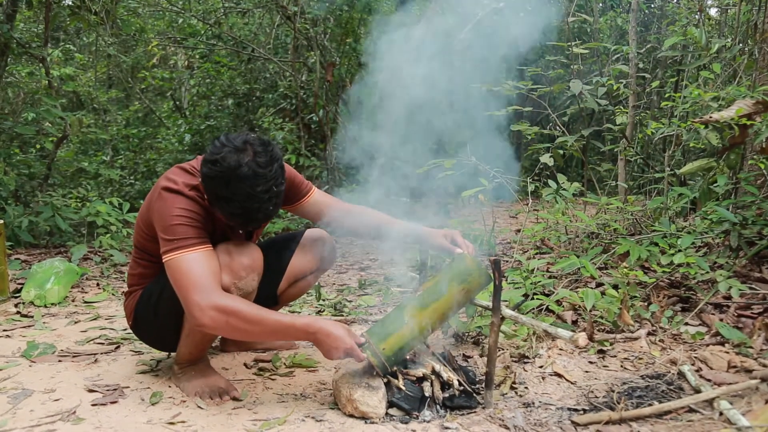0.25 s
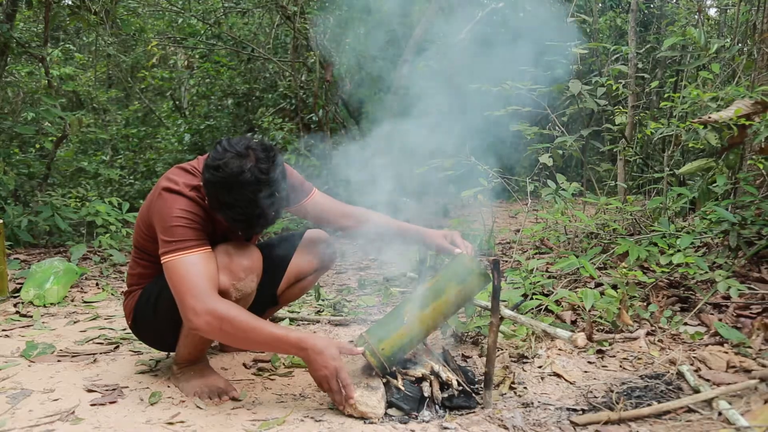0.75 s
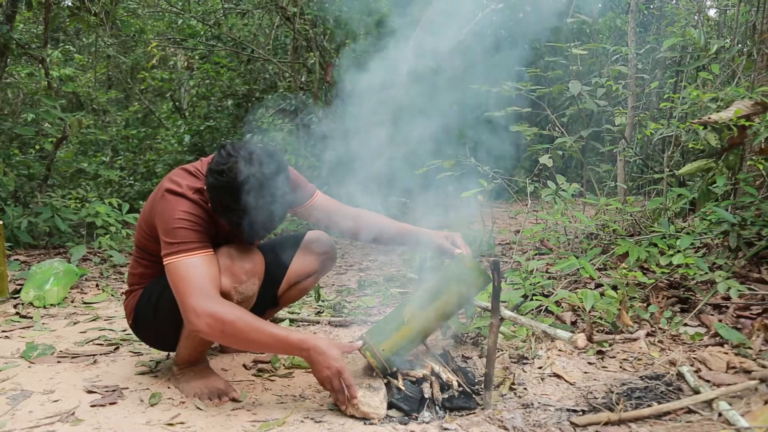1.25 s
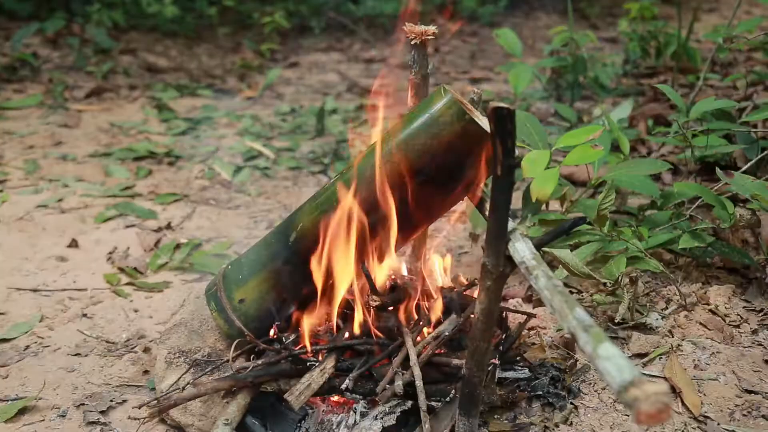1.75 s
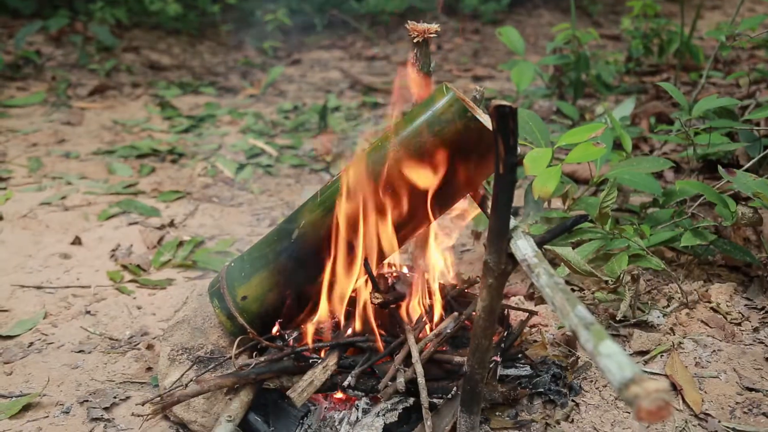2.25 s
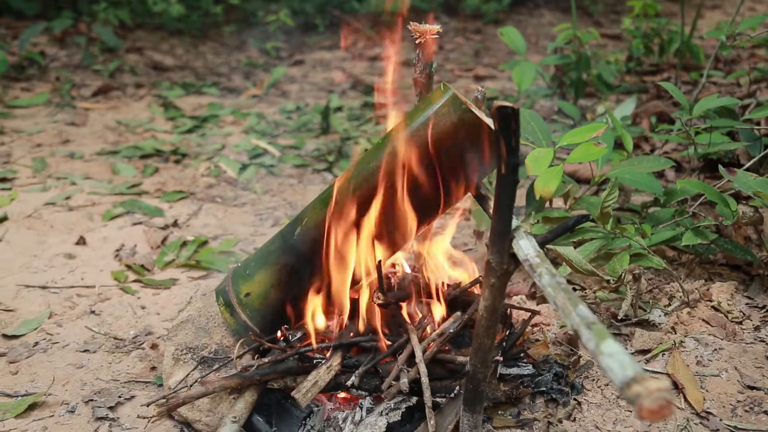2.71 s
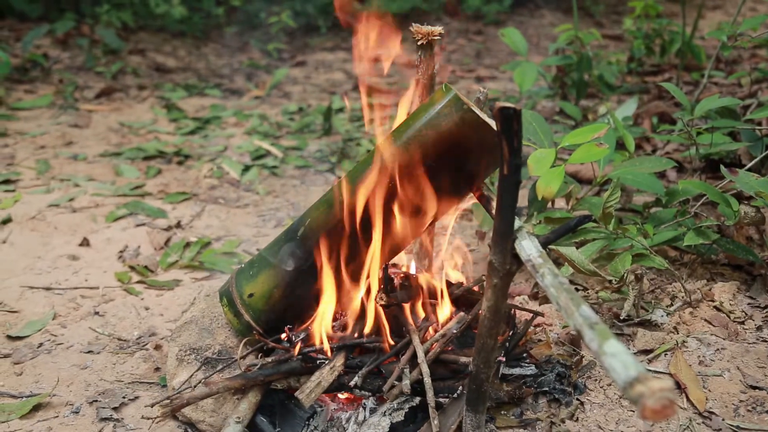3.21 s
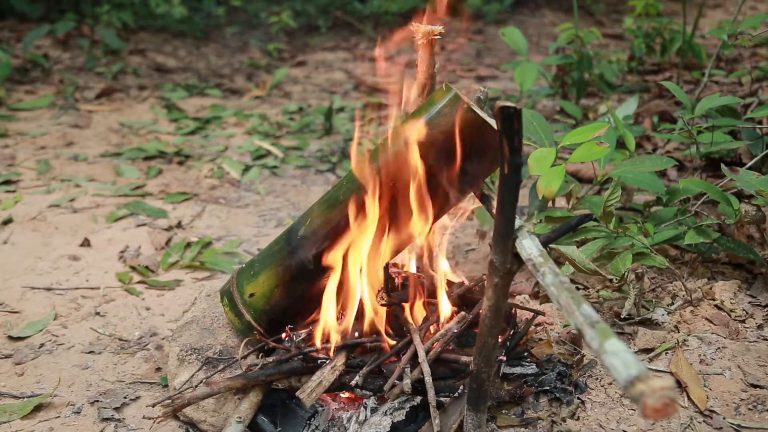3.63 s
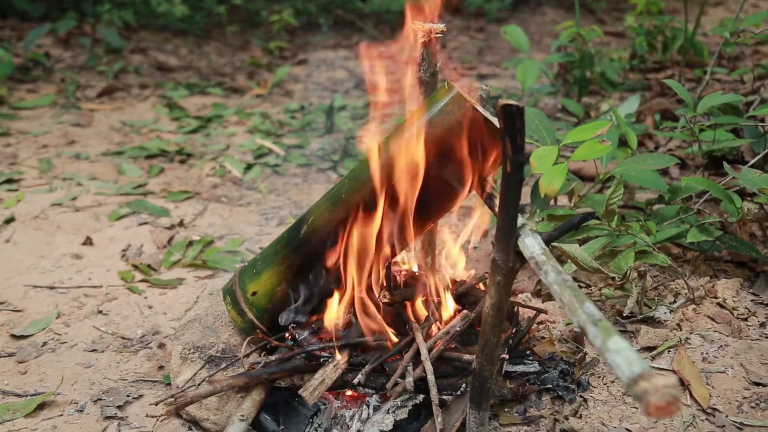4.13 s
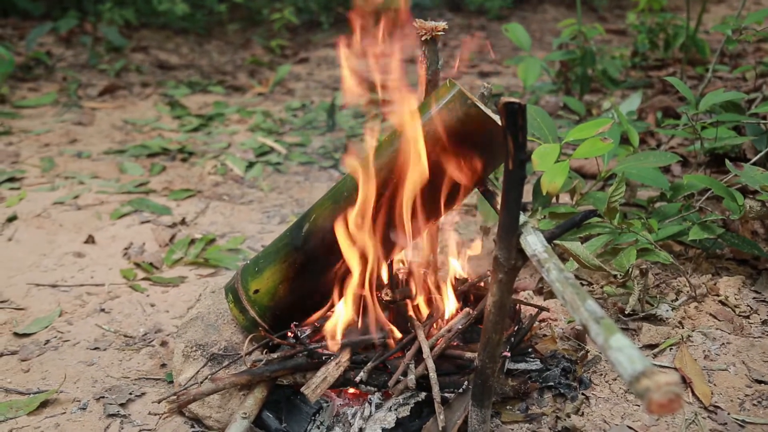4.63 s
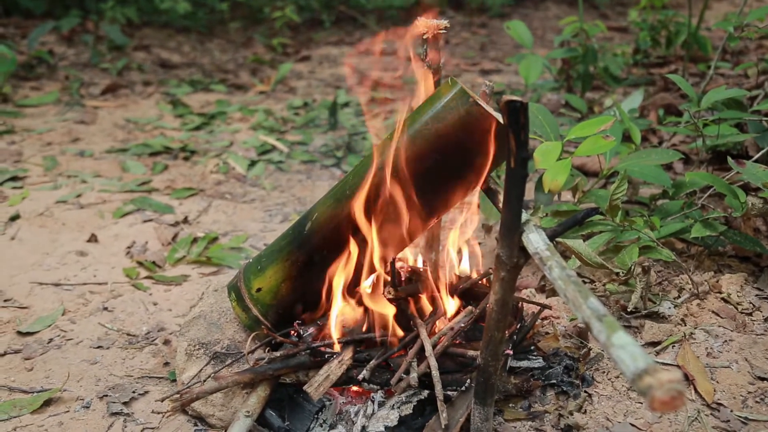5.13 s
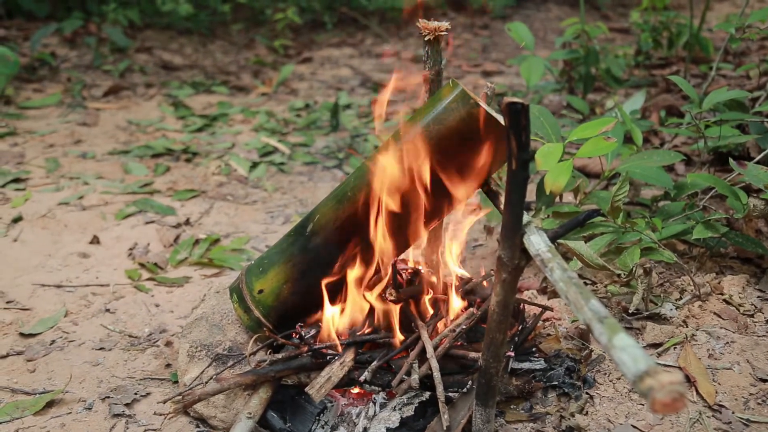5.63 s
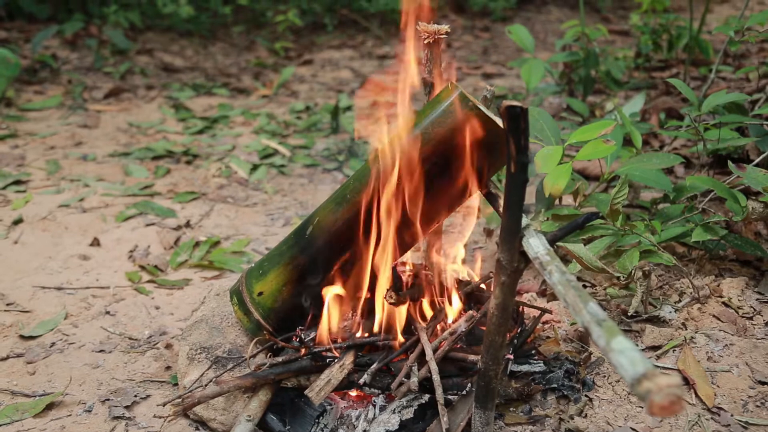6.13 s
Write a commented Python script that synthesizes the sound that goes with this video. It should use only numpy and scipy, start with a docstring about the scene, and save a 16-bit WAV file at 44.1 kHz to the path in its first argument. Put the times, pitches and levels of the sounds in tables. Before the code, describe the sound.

After a brief, quiet insect buzz outdoors, a nearby fire hisses and sizzles with steam, snapping and popping over softly fluttering flames.

```python
"""A forest, where cicadas drone with pulsing tymbals and a small smoky fire ticks.
After a short silence the fire is close and in full flame: sap steams out of a green bamboo tube
with a surging hiss, gusts make the flames flutter, fibres crackle and pockets of sap burst in pops.
The loudest pop overloads the microphone."""
import sys
import numpy as np
from scipy import signal
from scipy.fft import rfft, irfft, next_fast_len
from scipy.io import wavfile
from scipy.ndimage import uniform_filter1d

SR = 44100
rng = np.random.default_rng(int(sys.argv[2]) if len(sys.argv) > 2 else 0)


def dump_mix(stems):
    """Bounce the given channels to the path in sys.argv[1] as a 16-bit WAV at rate SR."""
    frames = np.atleast_2d(stems).T  # one column per channel
    limited = np.clip(frames, -1, 1)  # hard clip at full scale
    pcm = np.round(limited * 32767).astype(np.int16)
    wavfile.write(sys.argv[1], SR, pcm)


N = 280476
TIME = np.arange(N) / SR
FOREST_END_S, FIRE_START_S = 1.714, 1.763


def gain_of(db):
    """Decibels to amplitude."""
    return 10 ** (np.asarray(db) / 20)


def unit_rms(x):
    """Scales to rms 1."""
    return x / np.sqrt(np.mean(x ** 2) + 1e-20)


def automation(rows):
    """Joins (time, value) points into a curve at every sample."""
    return np.interp(TIME, *np.transpose(rows))


def eq_gain(eq, hz):
    """Gain of an EQ curve, its points joined on a log-frequency axis."""
    points_hz, db = np.transpose(eq)
    return gain_of(np.interp(np.log(hz + 1), np.log(points_hz + 1), db))


def equalise(x, eq):
    """Runs x through an EQ curve."""
    size = next_fast_len(N + 8192)
    return irfft(rfft(x, size) * eq_gain(eq, np.fft.rfftfreq(size, 1 / SR)), size)[:N]


def coloured(x, eq):
    """Equalises x and brings it to rms 1."""
    return unit_rms(equalise(x, eq))


def noise(eq):
    """Turbulence with a given colour, at rms 1."""
    return coloured(rng.standard_normal(N), eq)


def wander(rate_hz):
    """Smooth random modulation of rms 1, rolling off above rate_hz."""
    steps = rng.standard_normal(4096)
    hz = np.fft.rfftfreq(4096, N / SR / 4096)
    slow = irfft(rfft(steps) / (1 + (hz / rate_hz) ** 4))
    return unit_rms(np.interp(TIME, np.linspace(0, N / SR, len(slow)), slow))


def swell(peak_s, length_s):
    """A smooth rise from 0 to 1 and back."""
    return np.cos(np.pi * np.clip((TIME - peak_s) / length_s, -.5, .5)) ** 2


def band(x, low_hz, high_hz, order=2):
    """A causal band-pass."""
    sos = signal.butter(order, [low_hz, min(high_hz, .45 * SR)], "band", fs=SR, output="sos")
    return signal.sosfilt(sos, x)


def add(mix, start_s, sound):
    """Drops a sound into the mix."""
    part = mix[max(round(start_s * SR), 0):][:len(sound)]
    part += sound[:len(part)]


def scatter(t60_s, size=4096):
    """A dying cloud of reflections with energy 1."""
    cloud = rng.standard_normal(size) * gain_of(-60 * np.arange(size) / SR / t60_s)
    return cloud / np.linalg.norm(cloud)


def spike(spectrum):
    """A minimum-phase pulse: nothing sounds before the burst."""
    log_gain = np.log(spectrum + 1e-6)
    return np.fft.ifft(np.exp(np.conj(signal.hilbert(log_gain)))).real


# Bass-heavy bed of forest air: freq_hz, gain_db
AIR_EQ = [(15, -7), (45, 1), (75, 2.5), (100, -4), (128, -11.5), (153, 0.5), (178, -6.5), (200, -5.5),
          (280, -12), (600, -14.5), (1200, -19), (2200, -22.5), (7000, -24), (15500, -21)]
# Sheen of distant insects: freq_hz, gain_db
INSECT_EQ = [(6500, -37), (9300, -12.5), (10600, -15.5), (12400, -5.5), (13300, -5), (15000, -13),
             (17000, -27)]
# Faint far-off drones: pitch_hz, width_hz, level_db
DRONES = [(1448, 120, -75), (1765, 61, -73), (3410, 120, -73)]


def forest(air_db=-49, insect_db=-52.5, hum_hz=157.5, hum_db=-57):
    """Low air, a thin chorus of insects each on its own pitch, narrow drones and a wavering hum."""
    voices = sum(np.sin(2 * np.pi * hz * TIME) for hz in rng.uniform(8500, 15500, 60))
    chorus = rng.standard_normal(N) + .7 * unit_rms(voices)
    drones = sum(gain_of(db) * unit_rms(band(rng.standard_normal(N), hz - width / 2, hz + width / 2))
                 for hz, width, db in DRONES)
    hum_level = gain_of(hum_db + 1.5 * wander(7.7))
    hum = hum_level * np.sin(2 * np.pi * np.cumsum(hum_hz + 6 * wander(10.9)) / SR)
    return gain_of(air_db) * noise(AIR_EQ) + gain_of(insect_db) * coloured(chorus, INSECT_EQ) + drones + hum


# The cicada's pitch line: time_s, pitch_hz
CICADA_PITCH = [(0, 5330), (.33, 5313), (.6, 5450), (.7, 5480), (.76, 5306), (1.1, 5344), (1.33, 5425),
                (1.54, 5295), (1.7, 5305)]


def cicada(pulse_hz=78, jitter=0.167, level_db=-47.5, waver_db=.7, usual_hz=5320, db_per_hz=-0.0037):
    """Each tymbal pulse is a short falling tone; the trees blur the train."""
    cycle = np.cumsum(pulse_hz * (1 + jitter * wander(48.7))) / SR % 1
    pitch = automation(CICADA_PITCH)
    chirp_hz = pitch + 420 * (.5 - cycle) + 45 * wander(120)
    pulses = np.sin(np.pi * cycle) ** 2 * gain_of(0.51 * wander(46))
    song = pulses * np.sin(2 * np.pi * np.cumsum(chirp_hz) / SR)
    trees = signal.oaconvolve(song, scatter(.5, size=16384))[:N]
    song = band(song + .7 * trees, 5130, 5570, order=4)
    strain_db = db_per_hz * (pitch - usual_hz)  # softer as it strains above its usual pitch
    return gain_of(level_db + strain_db + waver_db * wander(4.8)) * unit_rms(song)


# Twigs ticking in the heat: start_s, peak_db (before trim), ring_hz
TWIG_TICKS = [(0.5392, -44, 8290), (0.9063, -40, 6400), (1.0274, -38, 9400), (1.206, -41, 7400),
              (1.5304, -38, 9900), (1.5914, -43, 9280), (1.6841, -41, 4800)]
# Hollow ring of a stick on bamboo: pitch_hz, gain_db, t60_s
STICK_MODES = [(1410, -12, 0.045), (1450, 0.5, 0.042), (1780, -7, 0.05), (2900, -13, 0.035),
               (3990, -4, 0.03), (4600, -7, 0.028)]


def smoulder(tick_trim_db=-2, knock_s=.541, knock_db=-41, scrape_db=-19, bump_s=1.685, bump_db=-41.5):
    """Heated twigs tick, a stick shifts against the bamboo with a knock and scrape; a soft low bump."""
    out, t = np.zeros(N), np.arange(4096) / SR
    for start_s, db, hz in TWIG_TICKS:
        tick = band(scatter(t60_s=0.035), hz * 0.84, hz * 1.2)
        add(out, start_s, gain_of(db + tick_trim_db) * tick / abs(tick).max())
    for hz, db, t60_s in STICK_MODES:
        add(out, knock_s, gain_of(knock_db + db - 60 * t / t60_s) * np.sin(2 * np.pi * hz * t))
    add(out, knock_s, gain_of(scrape_db) * band(scatter(0.033), 2000, 7700))
    rumble = unit_rms(band(rng.standard_normal(N), 36, 92))
    bump = rumble * np.exp(-((TIME - bump_s) / 0.026) ** 2)
    return out + gain_of(bump_db) * bump


# Low roar of the flames: freq_hz, gain_db
FLAME_EQ = [(12, -24), (28, -2.5), (45, -2), (70, -0.5), (115, -1), (170, -4), (280, -10.5), (450, -20),
            (1200, -40)]
# Flare-ups, each a soft whump: peak_s, rise_db
FLARES = [(1.95, 7.5), (2.08, 4.5), (2.23, 7), (2.73, 4), (3.15, 3.5), (3.48, 5.5), (3.78, 6), (4.89, 4.5),
          (5.3, 10), (5.62, 4.5), (6.12, 3), (6.21, 3)]
# Midrange rush of the draught: freq_hz, gain_db
DRAUGHT_EQ = [(150, -5), (400, -0.5), (700, -1), (1100, 0), (1480, 0), (1600, -5), (1900, -2), (3500, -18)]
# Fader ride on the draught: time_s, level_db
DRAUGHT_LEVEL = [(1.78, -52), (2.55, -49), (2.9, -52.5), (4.25, -51), (4.75, -53), (6.35, -51)]


def flames(level_db=-47.5, flare_s=0.11, billow_db=1.12, flutter_db=2.0, rush_flutter_db=1.16):
    """Tongues of flame billow, flutter and flare; the same gusts stir the rush of the draught."""
    gusts = wander(29)
    surge_db = sum(db * swell(peak_s, flare_s) for peak_s, db in FLARES) + billow_db * wander(4)
    roar = coloured(rng.standard_normal(N) * gain_of(flutter_db * gusts), FLAME_EQ)
    rush = noise(DRAUGHT_EQ) * gain_of(automation(DRAUGHT_LEVEL) + rush_flutter_db * gusts)
    return roar * gain_of(level_db + surge_db) + rush


# Breathy steam whistles: peak_s, level_db, pitch_hz, length_s
WHISTLES = [(2.172, -57, 1520, .04), (2.247, -43.5, 1410, .03), (2.515, -45, 1390, .035),
            (2.572, -45, 1450, 0.057), (2.66, -48, 1520, .03), (2.745, -47, 1320, 0.058)]


def whistles(waver_hz=75):
    """Steam squeezes through cracks in short wavering tones."""
    drift_hz = waver_hz * wander(90)
    out = np.zeros(N)
    for peak_s, db, hz, length_s in WHISTLES:
        span = abs(TIME - peak_s) < length_s / 2
        tone = np.sin(2 * np.pi * np.cumsum(hz + drift_hz[span]) / SR)
        out[span] += gain_of(db) * np.hanning(span.sum()) * tone
    return out


# Bright hiss of the steam jet: freq_hz, gain_db
JET_EQ = [(3500, -21), (5200, -5.5), (6200, 1.5), (7000, -.5), (7700, .5), (8200, -2), (9300, -1),
          (10200, 0.5), (10800, -6.5), (11700, -4), (12100, -7), (13400, -2), (15700, -0.5), (16200, -27)]
# Sizzle of the sap: freq_hz, gain_db
SAP_EQ = [(900, -9), (1900, -12), (2700, 0), (3000, 0), (3300, -0.5), (4200, .5), (4450, -4), (5500, -6),
          (9000, -35.5)]
# Spurts swelling over the steady jet: peak_s, rise_db, length_s
SPURTS = [(2.19, 1.5, 0.16), (3.08, 2.2, 0.38), (3.732, 3.5, 0.17), (3.953, 2, .14), (4.146, 4.5, .14),
          (4.43, 2.5, 0.15), (4.737, 3.8, .28), (4.972, 3, 0.14), (5.13, 2, .18), (5.542, 4, 0.21),
          (5.696, 2.5, 0.16), (6.14, 3.3, 0.21)]


def steam(jet_db=-40, sputter_db=0.58, sizzle_db=-45.8, drying_db_per_s=-0.23, bubbles_per_s=900):
    """Steam jets from the wet wood in spurts; tiny bubbles burst in the sap as it slowly dries."""
    pressure_db = sum(db * swell(peak_s, length_s) for peak_s, db, length_s in SPURTS) + 0.79 * wander(17)
    jet = noise(JET_EQ) * gain_of(jet_db + pressure_db + sputter_db * wander(33))
    bubbles = (rng.random(N) < bubbles_per_s / SR) * rng.standard_normal(N)
    bubbles *= gain_of(4.8 * np.minimum(rng.exponential(1, N), 4))  # a few stand out
    sizzle = coloured(rng.standard_normal(N) + 0.39 * unit_rms(bubbles), SAP_EQ)
    sap_db = sizzle_db + drying_db_per_s * (TIME - FIRE_START_S)
    sap_db += 0.22 * pressure_db + .5 * wander(4.7)  # the sizzle loosely follows the jet
    return jet + sizzle * gain_of(sap_db)


def lull(start_s=5.34, length_s=0.143, depth_db=-3):
    """A brief dip for the hiss, placed just after the loudest pop."""
    gate = 1. * ((TIME > start_s) & (TIME < start_s + length_s))
    return gain_of(depth_db * uniform_filter1d(gate, size=600))


def crackle(snaps_per_s=7, level_db=-29, spread_db=3):
    """Small fibres snap at random, in one dull layer and one bright."""
    out = np.zeros(N)
    for low_hz, high_hz in [(2400, 7900), (5500, 18000)]:
        triggers = rng.random(N) < snaps_per_s / SR
        snaps = triggers * gain_of(level_db + spread_db * np.minimum(rng.exponential(1, N), 3))
        out += band(signal.oaconvolve(snaps, scatter(.005))[:N], low_hz, high_hz)
    return out


# A pop's sharp snap, low thud and woody body: freq_hz, gain_db
SNAP_EQ = [(200, -63), (1200, -28), (2200, -1.5), (3300, 4), (5200, 3), (7700, 6), (9200, 3), (12000, -1),
           (15500, -1), (20000, -6)]
THUD_EQ = [(100, -36), (350, -10), (800, 4), (1350, 7.5), (1900, -9), (2600, -11), (5000, -35)]
WOOD_EQ = [(900, -39), (1800, 0), (2600, 5.5), (3600, -10), (6000, -11)]
# Sap pops, layer faders before trim and EQ: start_s, snap_db, thud_db, wood_db, logs_send_db
SAP_POPS = [(2.087, -12.5, -56, -40, -9), (2.4847, -24, -44, -44, -6), (2.6295, -18, -50, -45, -6),
            (2.7654, -19, -48, -48, -6), (2.7873, -18, -54, -49, -6), (3.3456, -7.5, -51, -28.5, -7),
            (3.6211, -13.5, -46, -37, -12), (4.13, -19.5, -63, -53, -4), (4.4709, -6, -51, -24.5, -5),
            (5.019, -21, -53, -49, -6), (5.3341, 11.5, -22.5, -31, -12.5), (5.3796, -16, -41.5, -37, -8),
            (5.502, -21, -40, -34.5, -4)]


def pops(snap_trim_db=4, thud_trim_db=29, wood_trim_db=25, ground_gain=0.15, tail_db=-15):
    """A sap pocket bursts: its spike arrives directly, off the ground, then scattered by the logs."""
    hz = abs(np.fft.fftfreq(2048, 1 / SR))
    direct = signal.unit_impulse(13)  # the ground bounce is 0.3 ms behind
    out = np.zeros(N)
    for start_s, snap_db, thud_db, wood_db, logs_send_db in SAP_POPS:
        snap = gain_of(snap_db + snap_trim_db) * eq_gain(SNAP_EQ, hz)
        thud = gain_of(thud_db + thud_trim_db) * eq_gain(THUD_EQ, hz)
        wood = gain_of(wood_db + wood_trim_db) * eq_gain(WOOD_EQ, hz)
        burst = spike(np.sqrt(snap ** 2 + thud ** 2 + wood ** 2))
        echoes = gain_of(logs_send_db) * scatter(.003) + gain_of(tail_db) * scatter(.02)
        echoes[0] += ground_gain
        add(out, start_s + .0013, signal.fftconvolve(np.concatenate([direct, echoes]), burst))
    return out


# Stereo width of the forest bed, and a faint side signal under the fire: freq_hz, side_gain_db
FOREST_WIDTH = [(60, -32), (200, -24), (380, -14), (1290, -12), (2380, -10), (8120, -10.5), (15000, -21)]
FLAME_WIDTH = [(60, -44), (110, -51), (200, -35.5), (380, -24.5), (700, -22.5), (1290, -42.5), (2380, -52),
               (15000, -37)]


def scene():
    """The forest, a moment of silence, then the fire up close; the forest bed has width, the fire a faint side
    signal."""
    far = np.interp(TIME, [FOREST_END_S, FOREST_END_S + .001, FIRE_START_S], [1, .02, 0])
    near = np.clip((TIME - FIRE_START_S) / .001, 0, 1)
    ambience = cicada() + forest() + smoulder()
    fire = lull() * steam() + flames() + whistles() + crackle()
    mid = far * ambience + near * fire + pops()
    side = far * equalise(forest(), FOREST_WIDTH) + near * equalise(flames(), FLAME_WIDTH)
    return np.array([mid + side, mid - side])


def record(dry, ceiling=1.6, cutoff_hz=15950):
    """The input stage clips the loudest pop; a steep low-pass takes off the very top."""
    clipped = np.clip(dry, -ceiling, ceiling)
    low_pass = signal.firwin(511, cutoff_hz, window=("kaiser", 9), fs=SR)
    return signal.oaconvolve(clipped, low_pass[None], "same", axes=1)


dry = scene()
out = record(dry)
dump_mix(out)
```